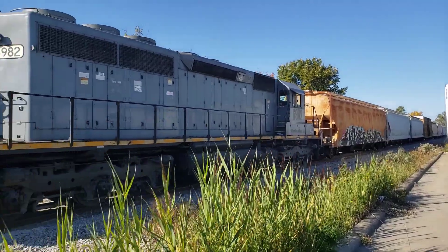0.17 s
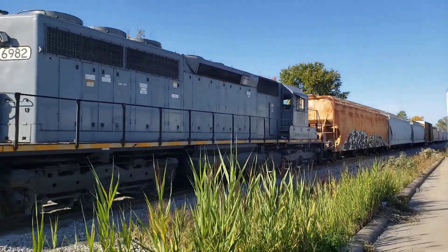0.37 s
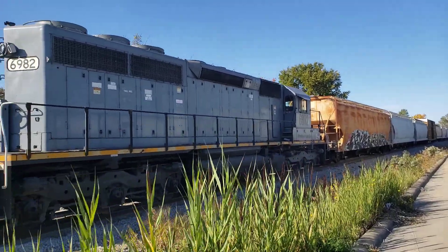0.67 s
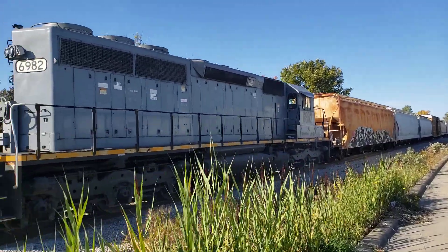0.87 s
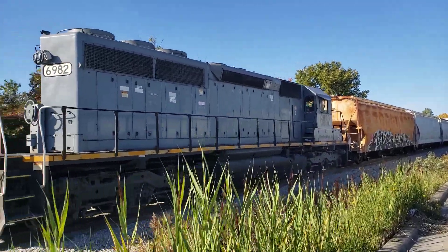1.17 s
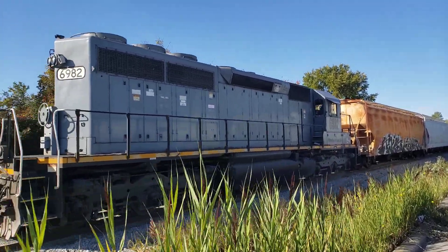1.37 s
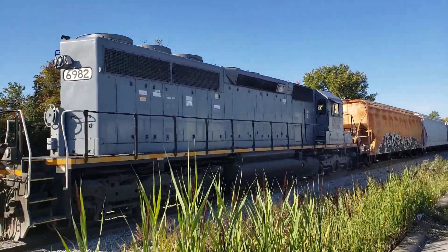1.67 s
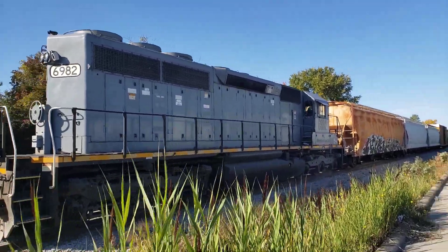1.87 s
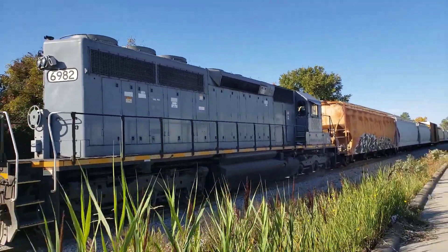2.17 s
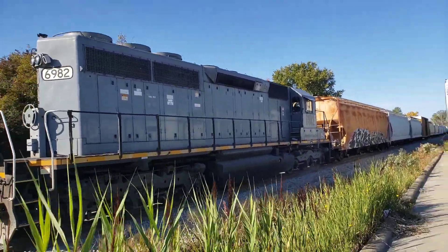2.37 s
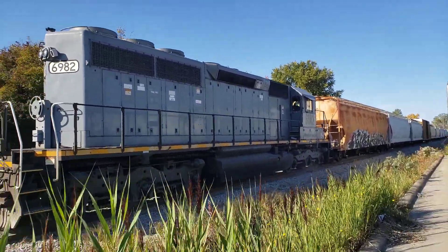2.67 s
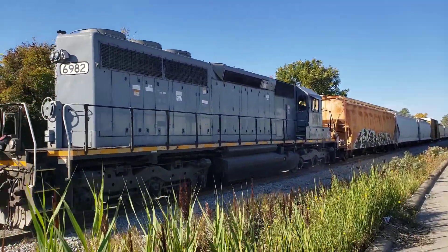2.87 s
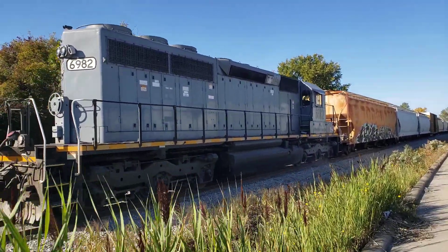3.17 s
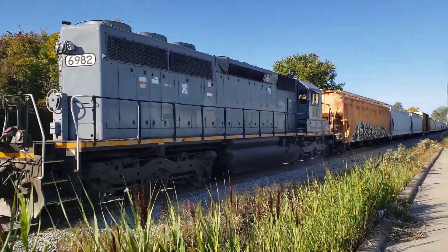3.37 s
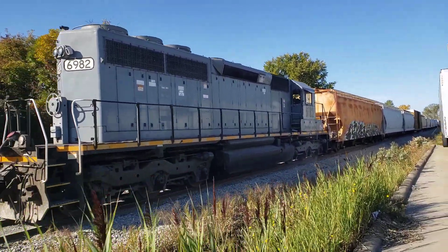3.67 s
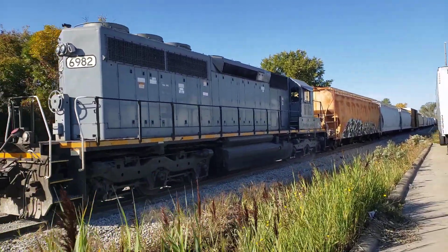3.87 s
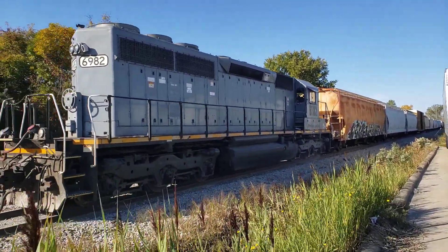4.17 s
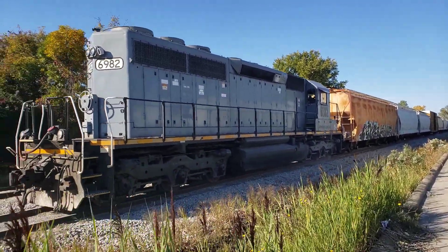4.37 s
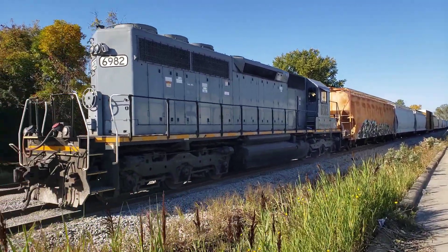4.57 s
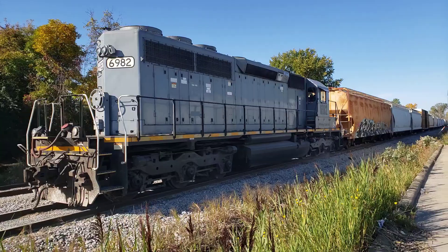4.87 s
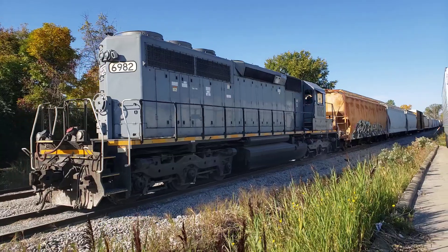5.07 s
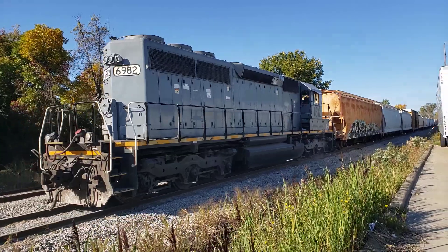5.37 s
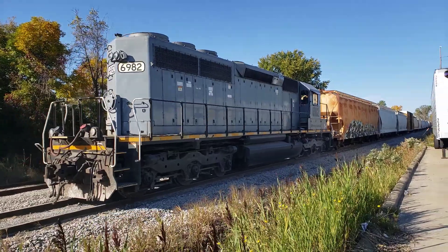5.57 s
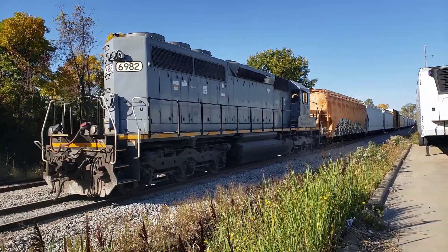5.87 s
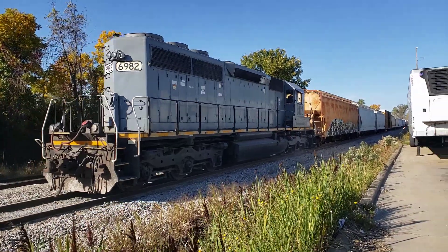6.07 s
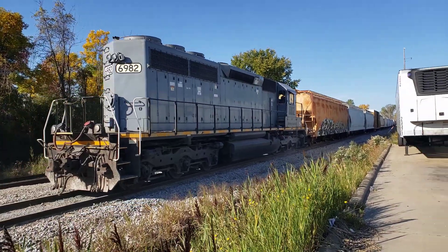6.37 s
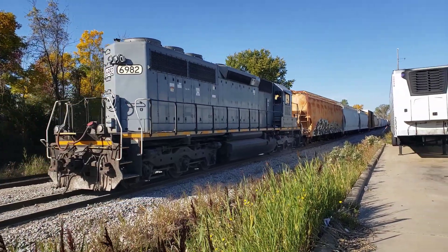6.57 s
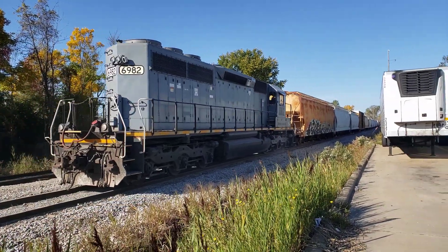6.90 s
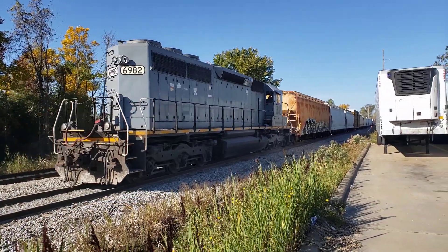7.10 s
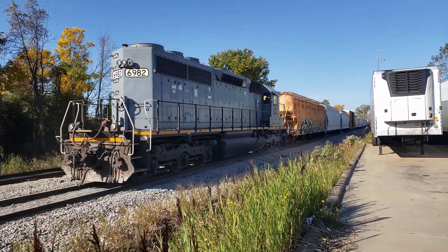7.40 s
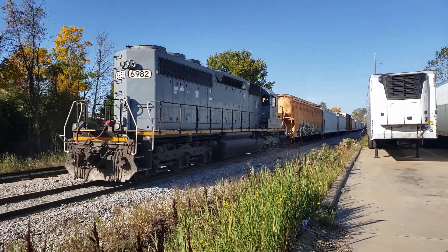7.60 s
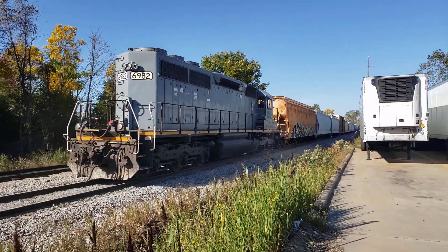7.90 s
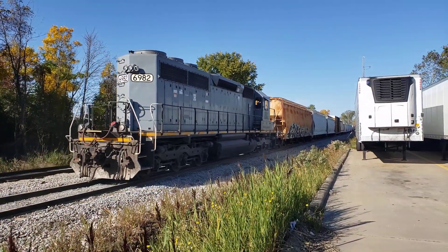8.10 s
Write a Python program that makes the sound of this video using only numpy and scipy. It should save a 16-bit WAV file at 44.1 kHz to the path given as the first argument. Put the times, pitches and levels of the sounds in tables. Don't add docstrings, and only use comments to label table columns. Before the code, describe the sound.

A heavy locomotive works at steady speed as it slowly moves away from a handheld stereo phone in the open. Its low exhaust booms swell and dip with echoes, one weak beat making them throb around eleven times a second. Wavering whines, rough rumble and broad airy roar continue throughout, leaning right. Short dry air spits tick along, a few chirping; a piercing overtone emerges after four seconds and fades near the end.

```python
import sys
import numpy as np
from scipy import signal
from scipy.fft import rfft, irfft
from scipy.io import wavfile

SR = 44100
rng = np.random.default_rng(int(sys.argv[2]) if len(sys.argv) > 2 else 0)


def transcribe(signal):
    frames = np.atleast_2d(signal).T
    limited = np.clip(frames, -1, 1)
    pcm = np.round(limited * 32767).astype(np.int16)
    wavfile.write(sys.argv[1], SR, pcm)


def how_loud(loudness_db):
    steps = np.asarray(loudness_db, float) / 20
    return 10 ** steps


N = 363384
TIME = np.arange(N) / SR
HZ = np.fft.rfftfreq(N, 1 / SR) + 1e-3

# (time [s], turns completed [turns])
CRANK_TURNS = [(0.0, -0.036), (1.0, 10.875), (2.5, 27.221), (4.0, 43.594), (5.0, 54.482), (8.24, 89.741)]
# (time [s], firing level [dB], weak-pair level [dB])
EXHAUST_LEVELS = [(0.0, -18.5, -33), (0.5, -20.5, -29), (0.75, -18.5, -25.5), (1.0, -16, -27.5),
                  (2.0, -15.5, -30.5), (2.5, -18, -33), (3.0, -23, -33.5), (3.3, -22.5, -33.5),
                  (4.0, -18, -28.5), (4.5, -17, -26.5), (4.8, -15.8, -30), (5.5, -16, -29.5),
                  (6.1, -17.8, -31), (7.0, -19, -28.5), (8.24, -18.5, -29.5)]
# (multiple of crank speed [x], level [dB])
FIRING_HARMONICS = [(8, 0.5), (16, -27.5), (24, -55), (48, -47)]
# (multiple of crank speed [x], level [dB])
WEAK_PAIR_HARMONICS = [(4, -24), (5, -12), (6, -6), (7, 0), (9, -6), (10, -12), (11, -20), (13, -27),
                       (14, -19), (15, -17), (17, -25), (18.5, -17), (20, -27), (21.5, -20), (30, -31)]
# (time [s], pitch [Hz])
BLOWER_PITCH = [(0.0, 3145.4), (2.0, 3145.7), (3.0, 3146.9), (4.0, 3144.4), (5.8, 3139.8), (6.9, 3141.5),
                (7.6, 3139.0), (8.24, 3138.5)]
# (pitch [Hz], left level [dB], right level [dB])
GEAR_MESHES = [(893, -57, -50), (1098, -64, -56), (1232, -67, -59), (1722, -64, -56), (2165, -67, -60),
               (2949, -74, -59), (6042, -69, -57), (6289, -64, -53), (7861, -76, -73)]
# (frequency [Hz], left density [dB per Hz], right density [dB per Hz])
RUMBLE_COLOUR = [(25, -79, -80), (40, -67, -62), (60, -59, -54.5), (82, -55, -55), (101, -66.5, -59.5),
                 (138, -59, -66), (182, -69.5, -59.5), (272, -69.5, -66), (323, -81, -69.5),
                 (453, -71, -65), (662, -72.5, -67), (732, -87, -74), (814, -71.5, -65), (1050, -77, -72)]
# (frequency [Hz], left density [dB per Hz], right density [dB per Hz])
ROAR_COLOUR = [(1018, -80.5, -73), (1740, -83, -72), (2240, -87.5, -76), (3080, -82.5, -72.5),
               (3700, -87.5, -73.5), (4700, -89.5, -75.5), (5660, -86.5, -75.5), (6100, -92, -75),
               (7700, -90, -95), (8470, -108.5, -85), (9850, -90, -80.5), (10920, -116, -78.5),
               (12100, -104.5, -89.5), (15000, -97.5, -83)]
# (frequency [Hz], correlation [0..1])
STEREO_LIKENESS = [(60, 0.87), (300, 0.86), (700, 0.99), (1400, 0.68), (3100, 0.14), (6800, 0.27),
                   (9200, 0.24), (15000, 0.2)]
# (time [s], gain [dB])
INTAKE_FACING = [(0.0, 1), (1.45, -1.5), (1.95, -0.4), (3.55, -0.5), (4.2, 3), (4.7, 2.4), (6.2, 5),
                 (7.1, 4.5), (7.75, 4), (8.24, 0.3)]
# (share of alongside gain [x], share of intake gain [x], loss [dB/s])
AIR_SWELLS = [
    (1, 0.067, 0.056),
    (0.9, 0.5, 0.22),
    (0.87, 1.07, 0.05),
    (0.45, 1.06, -0.1),
]
# (time [s], depth [dB], half length [s])
BLOWER_DIPS = [(0.17, -6, 0.11), (1.25, -10, 0.39), (2.4, -8, 0.62), (3.05, -4.5, 0.35), (4.4, -3.5, 0.32),
               (5.3, -11, 0.43), (6.7, -8, 0.71), (7.15, -11, 0.13)]
# (time [s], depth [dB], half length [s])
GEAR_DIPS = [(0.1, -2, 0.29), (2.65, -8, 0.51), (4.4, -3, .4), (5.07, -6, .2), (6.95, -9, .4)]
# (time [s], depth [dB], half length [s])
DRIVE_DIPS = [(0.25, -2, .12), (1.45, -3, 0.55), (2.2, -9, 0.48), (3.62, -7, .15), (4.65, -6, 0.45),
              (5.95, -9, 0.22), (6.8, -7.5, 0.59), (7.2, -12, .15), (8.05, -23, .35)]
# (time [s], depth [dB], half length [s])
ROTOR_DIPS = [(1.5, -9, 0.32), (2.45, -3, .3), (3.5, -6.5, 0.22), (4.8, -7, .2), (7.399, -4, .2),
              (8.1, -5, .25)]
# (time [s], peak level [dB])
VALVE_SPITS = [(0.2838, -41), (0.5023, -34.5), (0.9018, -37), (1.3718, -37), (1.8397, -40), (2.3062, -39),
               (2.7606, -43), (3.2041, -38), (3.6556, -39), (4.1046, -36), (4.564, -38), (5.007, -38),
               (5.4864, -40), (5.9155, -39), (7.0714, -40), (8.0057, -42)]
# (frequency [Hz], level [dB])
JET_COLOUR = [(1500, -20), (3000, -8), (5500, 1), (8000, -7), (10500, -2), (12500, 0), (15000, -7)]
# (time [s], pitch [Hz], peak level [dB])
SEAT_SQUEAKS = [
    (1.3718, 5800, -42),
    (1.8417, 5350, -41),
    (3.6556, 5600, -45),
    (5.007, 5650, -38),
    (5.9155, 5600, -48),
]


def curves(table):
    s, *columns = np.transpose(table)
    return [np.interp(TIME, s, column) for column in columns]


def over_hz(table):
    hz, *columns = np.transpose(table)
    return np.array([np.interp(np.log(HZ), np.log(hz), column) for column in columns])


def pan(db):
    return 2 * np.array([[how_loud(db)], [1]]) / (1 + how_loud(db))


def walk(rate):
    levels = rng.standard_normal(int(TIME[-1] * rate) + 2)
    coarse = TIME[::32]
    k, part = np.divmod(coarse * rate, 1)
    k = k.astype(int)
    ramp = part ** 2 * (3 - 2 * part)
    drift = levels[k] + ramp * (levels[k + 1] - levels[k])
    return 1.15 * np.interp(TIME, coarse, drift)


def step(at_s, rise_s):
    return .5 + .5 * np.tanh((TIME - at_s) / rise_s / 2)


def abreast():
    return 3 * (1 - step(at_s=1.34, rise_s=.14))


def fading(db, loss_db_s, nulls):
    dips = sum(depth * np.exp(-((TIME - s) / half_s) ** 2) for s, depth, half_s in nulls)
    return db - loss_db_s * TIME + dips


def stereo_noise():
    mid, side = rfft(rng.standard_normal((2, N)))
    likeness = np.clip(over_hz(STEREO_LIKENESS)[0], 0, 1)
    shared = np.sqrt((1 + likeness) / 2) * mid
    return shared + np.sqrt((1 - likeness) / 2) * side * np.array([[1], [-1]])


def band(spectrum, lo_hz, hi_hz):
    place = np.log(HZ / lo_hz) / np.log(hi_hz / lo_hz)
    return irfft(spectrum * np.sin(np.pi * np.clip(place, 0, 1)), N)


def tone(hz, fade_db, wobble):
    cycle = 2 * np.pi * np.cumsum(hz) / SR + wobble * walk(25)
    flutter = how_loud(fade_db * walk(4)) * (1 + wobble * walk(30)) / np.sqrt(1 + wobble ** 2)
    left = how_loud(1.8 * walk(3)) * np.sin(cycle - .4 + .6 * walk(2))
    return np.array([left, np.sin(cycle)]) * flutter * np.sqrt(2)


def exhaust(crank):
    firing_db, weak_db = curves(EXHAUST_LEVELS)
    even = sum(how_loud(db) * np.cos(k * crank) for k, db in FIRING_HARMONICS)
    multiples, levels_db = np.transpose(WEAK_PAIR_HARMONICS)
    receding_db = -27.5 - .6 * TIME
    weak = 0
    for n in range(4, 31):
        if n < 12:
            smear = .1 * (n - 8) ** 2 + np.pi * (n > 9)
        else:
            smear = 2 * np.pi * rng.random()
        if n % 8 == 0:
            continue
        waver_db = .7 * abs(n - 8) ** .5 * walk(3)
        heard_db = weak_db if abs(n - 8) < 2 else receding_db
        level_db = np.interp(n, multiples, levels_db) + heard_db + waver_db
        weak = weak - how_loud(level_db) * np.cos(n * (crank - np.pi) + smear)
    return pan(-3.6) * np.sqrt(2) * (how_loud(firing_db) * even + weak)


def gear_labour(crank):
    return np.cos(crank - 2) + .6 * np.cos(2 * crank + 1.6)


def blower_whine(hz, crank):
    level_db = fading(-39.5, .13, BLOWER_DIPS) + 1.2 + .8 * gear_labour(crank)
    return pan(-4.5) * how_loud(level_db) * tone(hz, fade_db=.4, wobble=.28)


def beamed_overtone(hz):
    beam = step(at_s=4.3, rise_s=.37) * (1 - step(at_s=7.8, rise_s=.28))
    level_db = -59.5 + 2.4 * abreast() + 12.5 * beam + .5
    return pan(-12) * how_loud(level_db) * tone(1.4992 * hz, fade_db=.3, wobble=.13)


def drive_whine(hz):
    level_db = fading(-51, -.6, DRIVE_DIPS)
    return pan(-9) * how_loud(level_db) * tone(.9783 * hz, fade_db=1.2, wobble=.4)


def gear_whine(crank):
    hz = 79 * np.gradient(crank) * SR / (2 * np.pi)
    level_db = fading(-42.5, .72, GEAR_DIPS) + .5 + 2.5 * gear_labour(crank)
    return pan(-6.5) * how_loud(level_db) * tone(hz, fade_db=.4, wobble=.2)


def rotor_tone(hz):
    return pan(-9) * how_loud(fading(-50.5, 0, ROTOR_DIPS)) * tone(hz / 2, fade_db=.8, wobble=.3)


def gear_meshes(hz):
    out = 0
    for mesh_hz, *port_db in GEAR_MESHES:
        level_db = np.array(port_db)[:, None] - 1.4 + 1.6 * abreast()
        out = out + how_loud(level_db) * tone(mesh_hz * hz / np.mean(hz), fade_db=1.6, wobble=.3)
    return out


def air_swells():
    facing_db = curves(INTAKE_FACING)[0]
    swells = []
    for alongside, intake, loss_db_s in AIR_SWELLS:
        swell = alongside * abreast() + intake * facing_db - loss_db_s * TIME
        swells.append(swell - np.mean(swell))
    return swells


def puffing(crank):
    return -.4 * np.cos(8 * crank)


def roar_and_case(crank, swells):
    colour = np.where(HZ < ROAR_COLOUR[0][0], over_hz(RUMBLE_COLOUR), over_hz(ROAR_COLOUR))
    noise = stereo_noise() * how_loud(colour) * np.sqrt(SR / 2)
    out = 0
    for hz in 20 * 2 ** np.arange(0, 10, .5):
        swell = swells[int(hz > 2000) + int(hz > 7000)]
        flicker_db = .4 * walk(1.5) + .5 * walk(8)
        air = band(noise, hz / np.sqrt(2), hz * np.sqrt(2))
        out = out + how_loud(swell + puffing(crank) + flicker_db) * air
    case_ring = band(noise, 730, 876)
    out += .26 * how_loud(swells[0]) * np.cos(crank - 2.3) * case_ring
    return how_loud(-1.52) * out


def intake_whistle(crank, swell):
    whistle_hz, width_hz = 9220, 240
    resonance = 1 / (1 + ((HZ - whistle_hz) / width_hz) ** 2)
    whistle = irfft(stereo_noise() * resonance, N)
    turbulence = how_loud(swell + puffing(crank) + .4 * walk(10) + 1.5 * walk(60))
    return pan(-5.5) * how_loud(-46.5) * turbulence * whistle / whistle.std()


def valve_spits():
    gate = np.zeros((2, N))
    age = TIME[:SR // 8]
    burst = (1 - np.exp(-age / .002)) * np.exp(-age / .015)
    for s, db in VALVE_SPITS:
        start = int((s - .002) * SR)
        gate[:, start:start + len(age)] = pan(-7.5 - s) * how_loud(db - .6 * s) * burst
    jet = irfft(stereo_noise() * how_loud(over_hz(JET_COLOUR)), N)
    return gate * how_loud(2 * walk(400) + 3) * jet / jet.std()


def valve_squeaks():
    half_s, sag = .0066, 1.2
    out = 0
    for s, hz, db in SEAT_SQUEAKS:
        age = TIME - s - half_s
        swell = how_loud(db) * np.exp(-(age / half_s) ** 2)
        out = out + swell * np.sin(2 * np.pi * hz * age * (1 - sag * age / 2))
    return pan(-11) * out


def scene():
    crank = 2 * np.pi * curves(CRANK_TURNS)[0]
    blower_hz = curves(BLOWER_PITCH)[0]
    swells = air_swells()
    out = exhaust(crank)
    out += blower_whine(blower_hz, crank) + beamed_overtone(blower_hz) + drive_whine(blower_hz)
    out += gear_whine(crank) + rotor_tone(blower_hz) + gear_meshes(blower_hz)
    out += roar_and_case(crank, swells) + intake_whistle(crank, swells[3])
    return out + valve_spits() + valve_squeaks()


def top_cut(x):
    return signal.sosfilt(signal.butter(12, 16590, fs=SR, output="sos"), x)


def record(dry):
    lag = .35 / (1 + (HZ / 300) ** 2)
    top_hz = 15740
    capsules = np.array([np.exp(-1j * lag), np.ones(len(HZ))]) * (HZ < top_hz)
    mix = irfft(rfft(dry) * capsules, N)
    return top_cut(mix)


dry = scene()
out = record(dry)
transcribe(out)
```